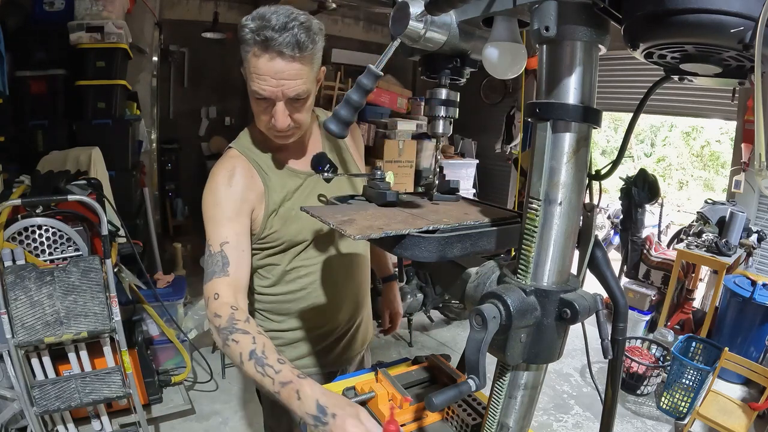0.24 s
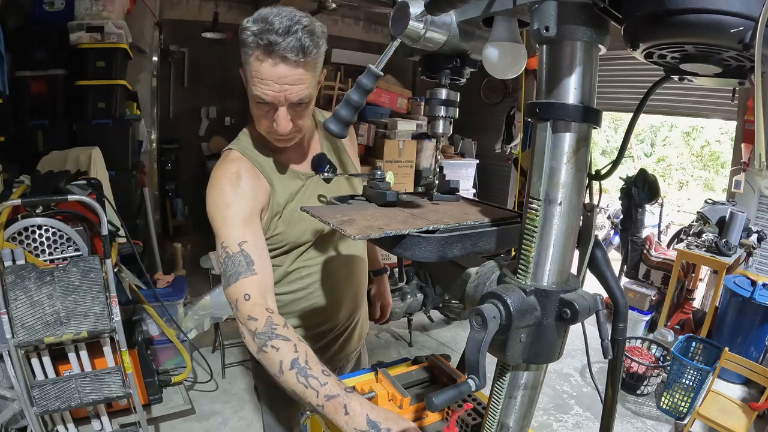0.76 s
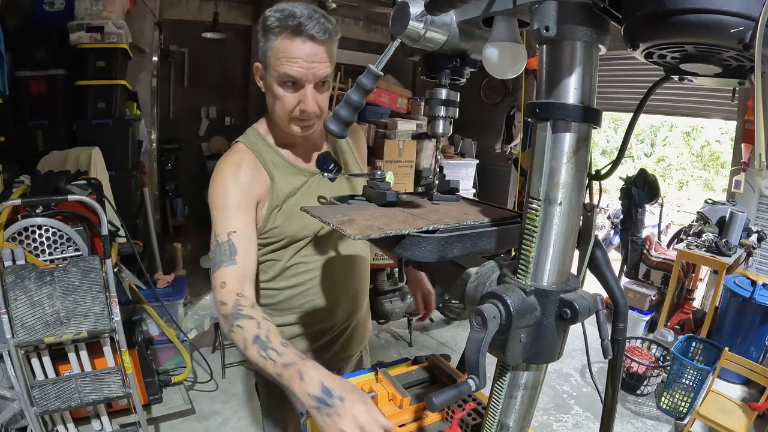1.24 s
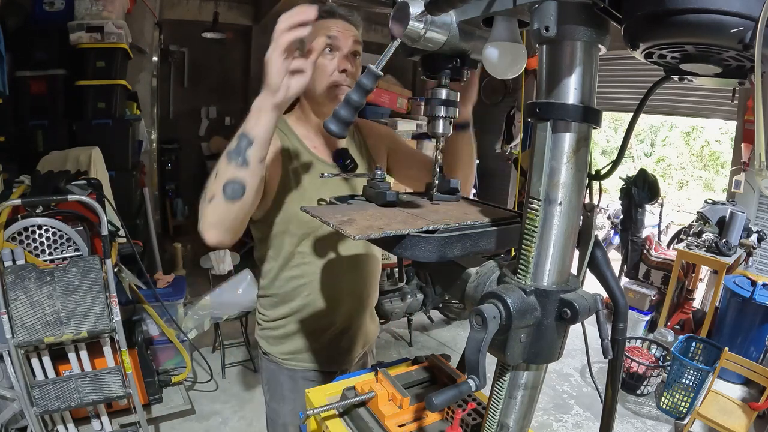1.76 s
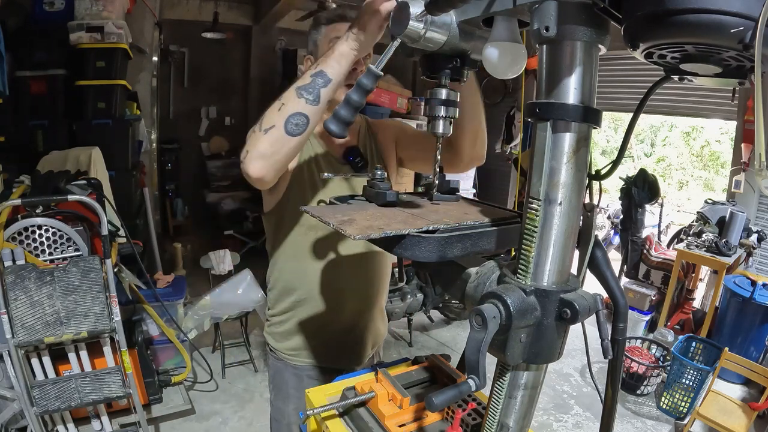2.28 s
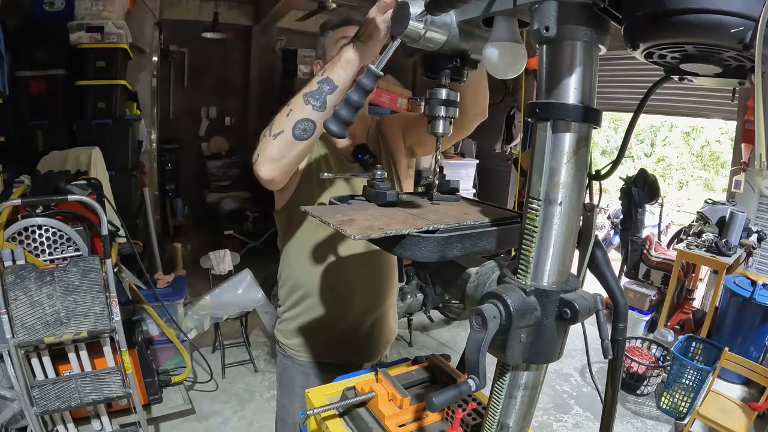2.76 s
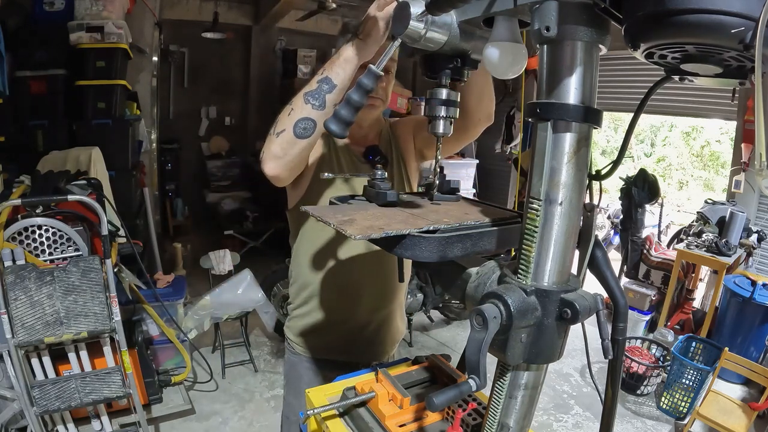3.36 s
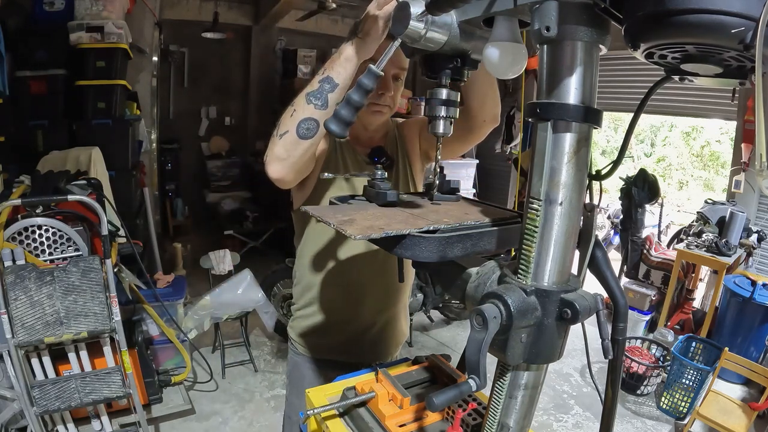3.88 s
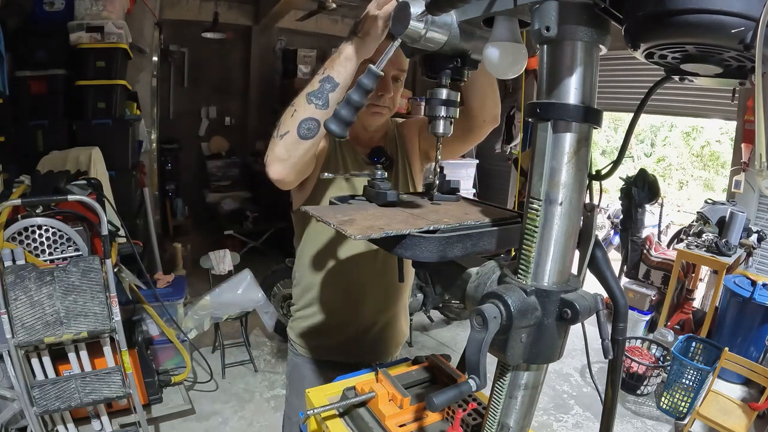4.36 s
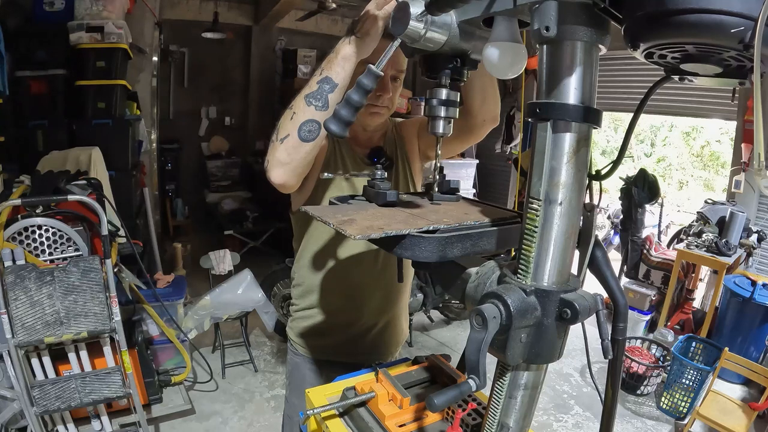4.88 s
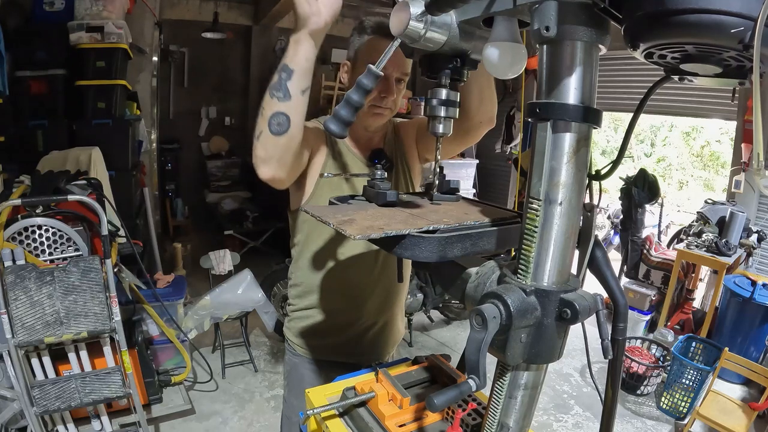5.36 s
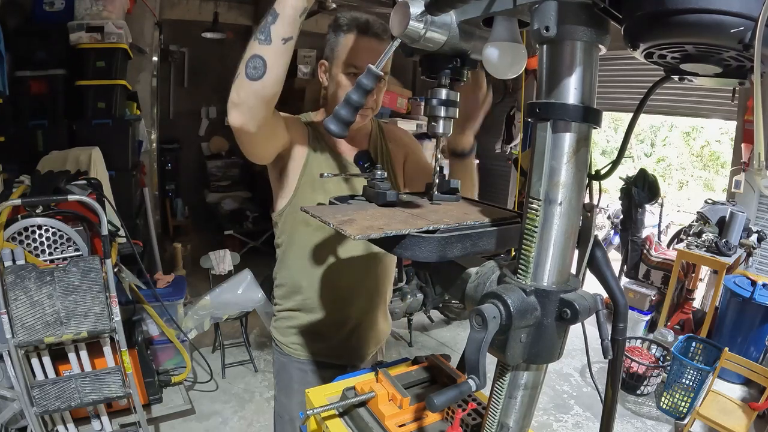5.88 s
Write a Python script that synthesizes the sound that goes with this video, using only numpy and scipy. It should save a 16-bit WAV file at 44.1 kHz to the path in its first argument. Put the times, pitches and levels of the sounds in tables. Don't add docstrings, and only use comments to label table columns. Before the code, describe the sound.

Quiet garage air and distant passing vehicles sit under a flurry of hollow plastic knocks, a second heavier flurry from a hand, and scattered dry ticks of plastic and steel. After a pause, a very loud switch snap sets off a drill press close to the microphone. It surges, shudders and scrapes briefly, clicks, then runs as a buzzing low hum with metallic rattle and a growing fizz as the bit is fed.

```python
import sys
import numpy as np
from scipy import signal
from scipy.fft import rfft, irfft, next_fast_len
from scipy.io import wavfile
from scipy.ndimage import uniform_filter1d

SR = 44100
rng = np.random.default_rng(int(sys.argv[2]) if len(sys.argv) > 2 else 0)


def unload_audio(sound):
    columns = np.transpose(np.atleast_2d(sound))
    steps = np.round(np.clip(columns, -1, 1) * 32767)
    wavfile.write(sys.argv[1], SR, steps.astype(np.int16))


def volts(x):
    e = np.asarray(x, float) / 20
    return 10 ** e


N = 270333
T = np.arange(N) / SR
HUM_HZ, SHAFT_HZ = 119.85, 29.93


def evened(x):
    return x / np.sqrt(np.mean(x ** 2) + 1e-20)


def read(points, hz):
    f, value = np.transpose(points)
    return np.interp(np.log(hz + 1), np.log(f + 1), value)


def along(rows):
    return np.interp(T, *np.transpose(rows), left=-120)


def noise(spectrum, lo_hz=0, hi_hz=SR):
    size = next_fast_len(N)
    hz = np.fft.rfftfreq(size, 1 / SR)
    z = rfft(rng.standard_normal(size)) * volts(read(spectrum, hz))
    in_band = (hz >= lo_hz) & (hz <= hi_hz)
    band_rms = np.sqrt(2 * np.sum(abs(z[in_band]) ** 2)) / size
    return irfft(z, size)[:N] / band_rms


def whistle(hz, width_hz, db):
    grid = np.maximum(hz + width_hz * np.linspace(-8, 8, 33), 1)
    return volts(db) * noise([(f, -10 * np.log10(1 + (2 * (f - hz) / width_hz) ** 8)) for f in grid])


def wander(per_s):
    size = int(SR / per_s)
    return evened(uniform_filter1d(uniform_filter1d(rng.standard_normal(N), size), size))


def sway(hz, wobble=0):
    return np.sin(2 * np.pi * hz * T + wobble)


def ring(hz, db, t60_s):
    t = np.arange(SR // 4) / SR
    fade = volts(db - 60 * t / max(t60_s, .002))
    return fade * (1 - np.exp(-1.5 * hz * t)) * np.sin(2 * np.pi * hz * t)


def crack(db, t60_s, lo_hz, hi_hz):
    band = signal.butter(2, [lo_hz, hi_hz], "band", fs=SR, output="sos")
    t = np.arange(SR // 4) / SR
    return evened(signal.sosfilt(band, rng.standard_normal(len(t)))) * volts(db - 60 * t / t60_s)


def add(mix, s, sound):
    part = mix[round(s * SR):][:len(sound)]
    part += sound[:len(part)]


def street():
    # closest at seconds, rumble in dB, lasting seconds.
    passes = [(.31, -50, 0.14), (.91, -51, 0.1), (1.78, -46, 0.2), (2.45, -54, .2), (3.7, -49, .3),
              (4.2, -52, 0.12)]
    rumble = volts(-64.5) + sum(volts(db) * np.exp(-((T - s) / span_s) ** 2) for s, db, span_s in passes)
    drone = volts(-53) * np.clip((T - 0.56) / .9, .3, 1)
    return rumble * whistle(164.3, 27, -4.5) + drone * whistle(428, 135, -3.5)


def room_tone():
    # frequency in Hz, density in dB per Hz.
    air = [(1.8, 3), (3.0, 9.5), (17, -11), (55, -20), (172, -21), (221, -25.5), (246, -19.5), (421, -28.5),
           (720, -30), (801, -30.5), (892, -31.5), (1890, -38.5), (15700, -43)]
    late = T - 4.42
    duck_db = -3.5 * (late > 0) * np.clip(1 - late ** 2, 0, 1)
    return volts(-45.5 + duck_db) * noise(air, 112, 13200)


def microphone_hiss():
    # frequency in Hz, density in dB per Hz.
    hiss = [(1.8, -32), (3.0, 3), (16, 2.5), (24, -24), (38, -10.5), (172, -29), (364, -37), (3610, -41.5),
            (14100, -40), (15700, -51)]
    return volts(-59) * noise(hiss, 4000, 15600)


def garage(x):
    # frequency in Hz, t60 in seconds.
    room = [(100, 0.24), (500, 0.42), (2000, 0.36), (6000, 0.11), (14000, 0.11)]
    taps = np.zeros(SR // 2)
    at = np.arange(300, SR // 2 - 20, 20)
    taps[at + rng.integers(0, 20, len(at))] = rng.choice([-1., 1.], len(at))
    hz, t, z = signal.stft(taps, SR, nperseg=256)
    tail = signal.istft(z * volts(-60 * t / read(room, hz)[:, None]), SR, nperseg=256)[1]
    return signal.fftconvolve(x, tail / np.linalg.norm(tail))[:N]


def knocks():
    # frequency in Hz, level in dB, t60 in seconds.
    box = [(101, -11.5, 0.12), (243, -6, 0.045), (433, 1.5, 0.059), (599, -4, 0.1), (798, -1, 0.039),
           (1244, -11, 0.047), (350, -4.5, 0.25)]
    # start in seconds, peak in dB, main ring in Hz, tick in dB.
    bottle = [(.730, -19, 500, -37.5), (.742, -22, 330, -45), (.750, -29, 320, -40), (.765, -32, 310, -47),
              (.775, -23, 325, -50), (.7845, -30, 327, -57), (.7935, -36, 325, -57),
              (.868, -37, 493, -47.5)]
    # start in seconds, peak in dB, main ring in Hz, tick in dB.
    hand = [(1.934, -26, 704, -37), (1.941, -15, 268, -49), (1.949, -16.5, 256, -36.5),
            (1.957, -19, 532, -38), (1.966, -17.5, 280, -38), (1.981, -17, 302, -37),
            (1.998, -25, 350, -42), (2.010, -27, 340, -48), (2.021, -23.5, 328, -50), (2.04, -32, 344, -56),
            (2.057, -35, 400, -46), (2.637, -28.5, 433, -40), (2.665, -32, 580, -48), (2.69, -33, 570, -47)]
    out = np.zeros(N)
    for rows, centre_hz in ((bottle, 4270), (hand, 2810)):
        for s, db, hz, tick_db in rows:
            panel = ring(hz, db - 4, 32 / hz)
            others = sum(ring(f * rng.uniform(0.876, 1.007), db + d - 7, t60) for f, d, t60 in box)
            tick = ring(centre_hz * (1 + .06 * rng.uniform(-0.81, 1)), tick_db + 1.5, .02)
            tick += crack(tick_db - 7, 0.034, .8 * centre_hz, 1.14 * centre_hz)
            tick += crack(tick_db + 0.18, 0.049, 670, 3500)
            tick += crack(tick_db - 9, 0.054, 1.4 * centre_hz, 8500)
            add(out, s, panel + others + tick)
    return out


def lever_ticks():
    # start in seconds, peak in dB, low ring in Hz, high ring in Hz, high ring in dB.
    touches = [(2.312, -20.5, 910, 3170, -31.5), (2.316, -25, 710, 1810, -32), (2.327, -24, 920, 2640, -38),
               (2.63, -30, 1200, 3120, -37), (2.6315, -46, 1260, 2500, -35), (2.645, -43, 860, 2530, -43),
               (2.724, -30.5, 910, 1960, -43.5), (2.948, -32, 754, 2580, -41),
               (3.065, -31, 1040, 3270, -40), (3.455, -24.5, 850, 1900, -36), (3.458, -22, 670, 3050, -41),
               (3.469, -35, 570, 1960, -54), (3.543, -33.5, 810, 2730, -55),
               (3.901, -29.5, 804, 2380, -43.5)]
    out = np.zeros(N)
    for s, db, low_hz, high_hz, high_db in touches:
        top_db = high_db + 0.5 * min(high_db + 32, 0)
        top_hz = 6400 * (1 + 0.055 * rng.uniform(-1, 1))
        low = ring(low_hz, db, 0.021) + ring(1.235 * low_hz, db - 11, 0.028)
        low += crack(db - 15.5, 0.026, 480, 1070)
        high = ring(high_hz, high_db + 3.5, 0.02) + crack(high_db - 2, 0.029, 900, 3200)
        top = ring(top_hz, top_db, 0.011) + crack(top_db - 4, 0.014, 4500, 9300)
        add(out, s, low + high + top)
    return out


def thuds():
    # start in seconds, frequency in Hz, level in dB, t60 in seconds.
    struck = [
        (1.938, 101, -30, 0.19),
        (4.42, 840, -16.5, 0.071),
        (4.424, 972, -17, 0.1),
        (4.427, 1330, -14, 0.036),
        (4.43, 484, -12, 0.047),
    ]
    out = np.zeros(N)
    for s, hz, db, t60_s in struck:
        add(out, s, ring(hz, db, t60_s))
    return out


def toggle_switch():
    # start in seconds, level in dB.
    chatter = [(4.4195, -26), (4.422, -15), (4.424, -8), (4.4255, -1.5), (4.4288, 0), (4.4284, 3),
               (4.4297, 1.5), (4.431, -5), (4.4327, -7)]
    # frequency in Hz, level in dB, t60 in seconds.
    toggle_modes = [(1400, -14, 0.0095), (3108, 1.5, 0.013), (6510, 2.5, 0.0071), (9600, -8, 0.0059),
                    (14500, -20, 0.0051)]
    out = np.zeros(N)
    for s, db in chatter:
        for hz, mode_db, t60_s in toggle_modes:
            add(out, s, ring(hz * (1 + .07 * rng.uniform(-1.23, 1)), db + mode_db, t60_s))
        add(out, s, crack(db - 5.5, 0.0091, 1300, 8500) + crack(db - 24, 0.005, 9000, 20000))
    return out


def starting_switch():
    # start in seconds, ring in dB, ring in Hz, broad crack in dB.
    clicks = [(4.4664, -35, 9500, -43), (4.4984, -22, 9390, -27), (4.563, -12.5, 6070, -23),
              (4.5667, -18, 7500, -22.5), (4.577, -17, 6830, -35), (4.599, -35, 6900, -32),
              (4.654, -37, 6100, -41), (4.829, -40, 6800, -53), (4.8633, -31.5, 6460, -48),
              (5.73, -34, 9400, -40), (5.989, -39, 7200, -42)]
    out = np.zeros(N)
    for s, db, hz, crack_db in clicks:
        cracks = crack(crack_db, 0.026, 4000, 10300) + crack(crack_db - 14, .04, 10000, 15500)
        add(out, s, ring(hz, db, 125 / hz) + cracks)
    return out


def hum_and_shaft(lurch):
    # time in seconds, level of the second multiple in dB.
    pull = [(4.435, -22.5), (4.524, -12), (4.556, -20), (4.72, -25), (4.788, -21.5), (5.6, -21),
            (5.64, -20), (6.03, -22), (6.13, -24.5)]
    # multiple of twice the mains, level in dB.
    hum_lines = [(1, -18.5), (2, 0), (3, -2), (4, -8), (5, -8), (6, -17), (7, -19)]
    # multiple of the shaft speed, level in dB.
    orders = [(5, -36), (6, -26.5), (9, -30), (10, -13.5), (11, -5.5), (13, -23), (14, -14), (15, -11.5),
              (17, -27), (18, -14.5), (19, -9.5), (21, -15), (23, -25), (26, -17.5), (29, -21), (31, -22),
              (33, -18.5), (37, -22), (39, -32)]
    hum = sum(volts(db + .8 * wander(9)) * sway(k * HUM_HZ, 2 * np.pi * rng.random()) for k, db in hum_lines)
    shaft = sum(volts(db + 3.8 * wander(16)) * sway(k * SHAFT_HZ, .9 * wander(8)) for k, db in orders)
    return np.sqrt(2) * volts(along(pull)) * (hum + (1 - lurch) * shaft)


def casting(surge_db, feed, lurch):
    # frequency in Hz, density in dB per Hz.
    steady = [(40, -60), (100, -26), (190, -20), (230, -3), (310, 2), (345, -0.5), (385, -5), (450, -5.5),
              (590, -3), (680, -6.5), (980, -13.5), (1200, -16.5), (1350, -19.5), (1900, -27), (3000, -100)]
    # frequency in Hz, density in dB per Hz.
    jolt = [(59, -47), (100, -52), (166, -42), (204, -26), (242, -3), (427, -3), (727, -2.5), (830, -8.5),
            (948, -7), (1070, -10.5), (1800, -17), (2340, -53), (3960, -120)]
    # frequency in Hz, level in dB,
    # loudest at seconds.
    panels = [(939, -17.5, 4.495), (717, -12, 4.5), (719, -12, 4.53), (621, -17, 4.48), (528, -17, 4.53),
              (504, -15, 4.575), (310, -13, 4.605), (1204, -23, 4.56)]
    body_db = -16.5 + surge_db + 2.5 * feed + 0.5 * wander(2.7) + 0.25 * np.cos(2 * np.pi * HUM_HZ * T)
    roar = volts(-6) * np.sqrt(1 - lurch) * noise(steady, 200, 1300)
    roar += volts(-6.5) * np.sqrt(lurch) * noise(jolt, 200, 1100)
    shudder = np.zeros(N)
    for hz, db, s in panels:
        shudder += volts(db + 2) * sway(hz, .7 * wander(32)) * np.exp(-((T - s) / 0.026) ** 2)
    return volts(body_db) * roar + shudder


def rattle(surge_db, feed):
    # frequency in Hz, density in dB per Hz.
    gears = [(760, -12), (1300, -13.5), (1650, -17.5), (1880, -7), (2020, -3), (2320, -1), (2670, -2.5),
             (3650, -10.5), (4150, -13), (5000, -22), (6500, -41), (11000, -120)]
    # frequency in Hz, width in Hz, level in dB.
    loose_parts = [(1870, 62, -1), (2384, 100, -4), (2627, 130, 1.5), (2905, 77, -0.5), (3800, 45, -14)]
    rasp_db = 1.8 * np.cos(2 * np.pi * HUM_HZ * T) + 1.3 * np.cos(2 * np.pi * SHAFT_HZ * T)
    rasp_db += .9 * wander(45) + .8 * wander(220)
    ringing = evened(sum(whistle(*part) for part in loose_parts))
    sound = volts(-1.5) * noise(gears, 2020, 4500) + volts(-5 + 2.2 * wander(25)) * ringing
    return volts(-39 + 1.64 * surge_db + 3.5 * feed + rasp_db) * sound


def scrape_and_fizz(surge_db, feed):
    # frequency in Hz, density in dB per Hz.
    scrape = [(2650, -23), (4500, -11), (5530, -6), (5950, -4), (6770, -4.5), (7280, -6.5), (9630, -12.5),
              (10600, -16), (15500, -32)]
    # frequency in Hz, density in dB per Hz.
    fizz = [(2650, -27), (4500, -7), (5040, -1.5), (5790, 2.5), (6580, -3), (9480, -4.5), (12600, -17),
            (14000, -48)]
    drop_out_s = 4.58
    late = np.maximum(T - drop_out_s, 0)
    jerk_db = 6.5 * (T > drop_out_s - .015) * np.exp(-late / 0.094)
    scrape_db = -39.5 + 0.49 * surge_db - 65 * late + jerk_db
    fizz_db = -57 + 12 * feed + np.minimum(surge_db, 0)
    hiss = volts(scrape_db) * noise(scrape, 4700, 13000) + volts(fizz_db) * noise(fizz, 5000, 13000)
    flutter_db = 0.36 * np.cos(2 * np.pi * HUM_HZ * T) + 1.4 * wander(30) + 1.5 * wander(400)
    return volts(flutter_db) * hiss


def bearings_and_bit():
    # frequency in Hz, width in Hz, level in dB.
    whine = [
        (5600, 54, -59),
        (9340, 120, -41),
    ]
    running, starting = [whistle(*line) for line in whine]
    singing = (T > 4.7) * volts(-51 + 1.48 * wander(12)) * sway(4297, .7 * wander(18))
    out = np.interp(T, [4.6, 5.3], [0, 1]) * running
    out += np.interp(T, [4.465, 4.475, 4.55, 4.57], [0, 1, 1, 0]) * starting
    return out + np.interp(T, [5.4, 5.86], [.4, 1]) * singing


def drill_press():
    # time in seconds, dB above steady running.
    surge = [(4.434, -14), (4.445, 4.5), (4.47, 5), (4.495, 10), (4.525, 13), (4.55, 9.5), (4.575, 6),
             (4.61, 3), (4.68, 0)]
    # time in seconds, pressure from 0 to 1.
    pressure = [(4.8, 0), (4.9, 0.4), (5.15, 0.5), (5.35, 0.82), (5.43, 0.6), (5.55, 0.78), (5.95, 0.79),
                (6.13, 0.6)]
    surge_db = along(surge)
    feed = np.interp(T, *np.transpose(pressure))
    lurch = np.interp(T, [4.58, 4.7], [1, 0])
    out = hum_and_shaft(lurch) + casting(surge_db, feed, lurch)
    return out + rattle(surge_db, feed) + scrape_and_fizz(surge_db, feed) + bearings_and_bit()


def scene():
    hits = knocks() + lever_ticks() + thuds()
    snaps = toggle_switch() + starting_switch()
    echoes = garage(volts(-12.5) * hits + volts(-26) * snaps)
    mid = street() + room_tone() + hits + snaps + echoes + drill_press()
    side = microphone_hiss()
    return np.array([mid + side, mid - side])


def low_pass(x):
    return signal.sosfilt(signal.butter(12, 15820, fs=SR, output="sos"), x)


def record(dry):
    mix = np.clip(dry, -1, 1)
    return low_pass(mix)


dry = scene()
out = record(dry)
unload_audio(out)
```